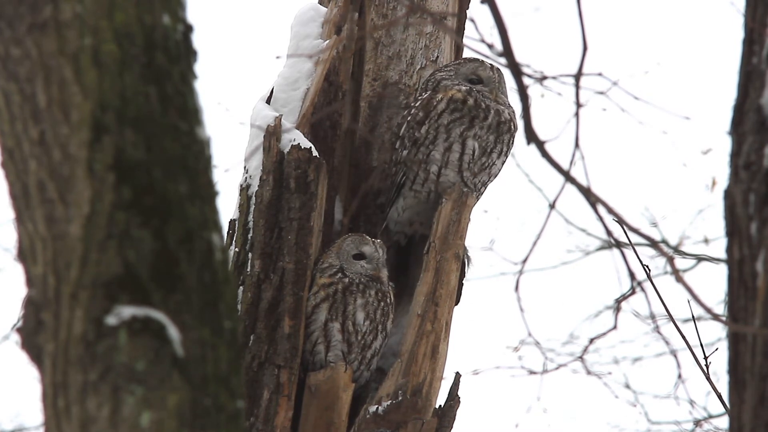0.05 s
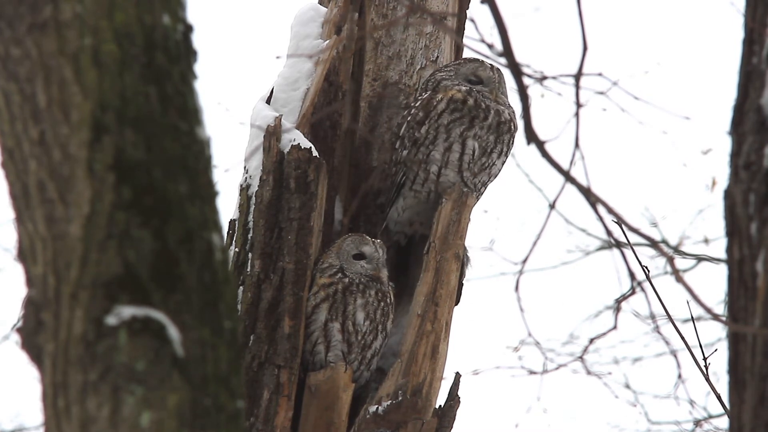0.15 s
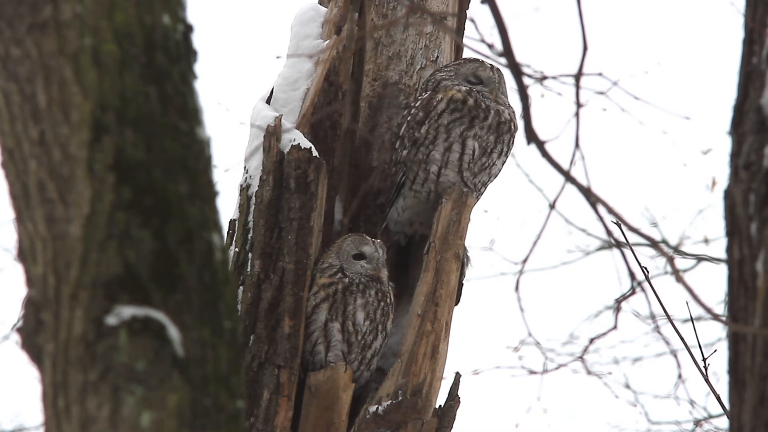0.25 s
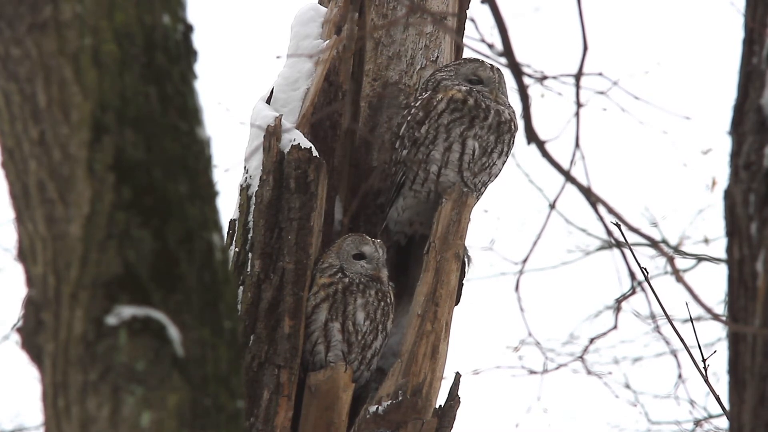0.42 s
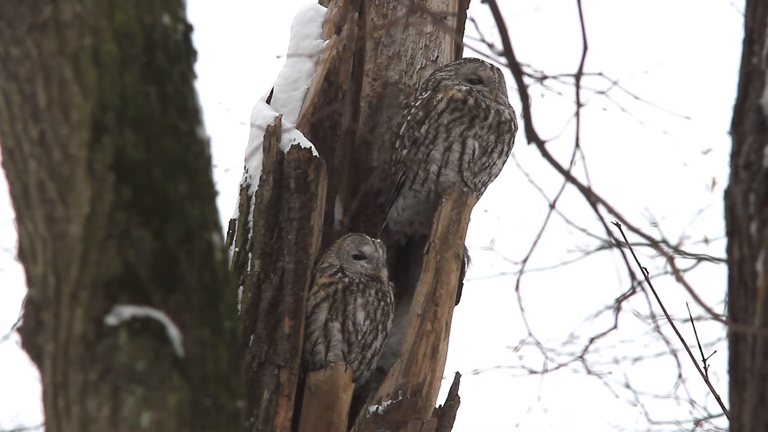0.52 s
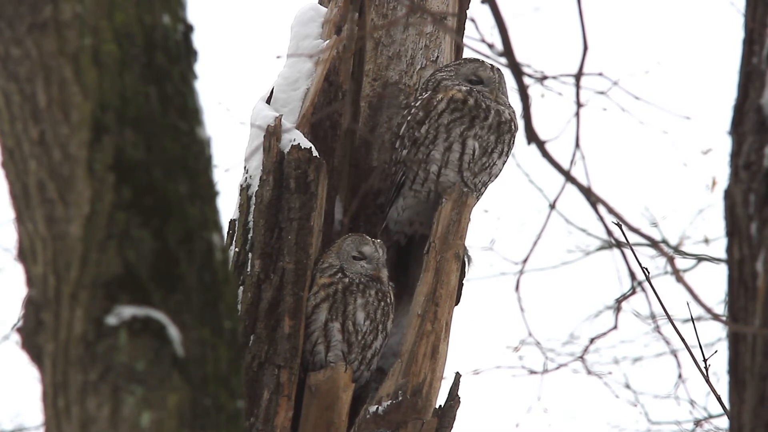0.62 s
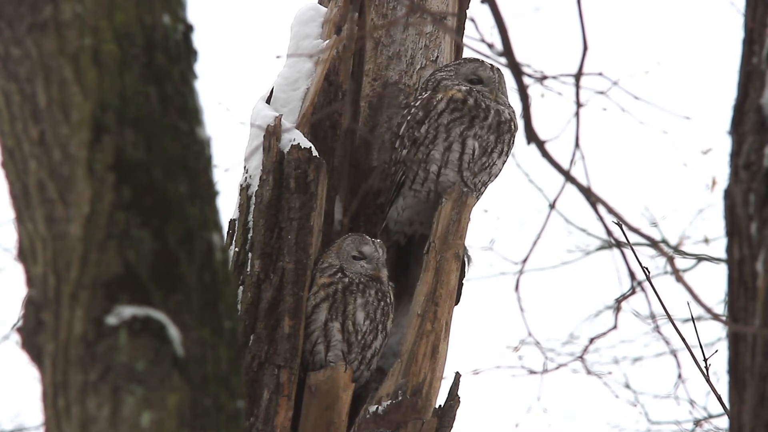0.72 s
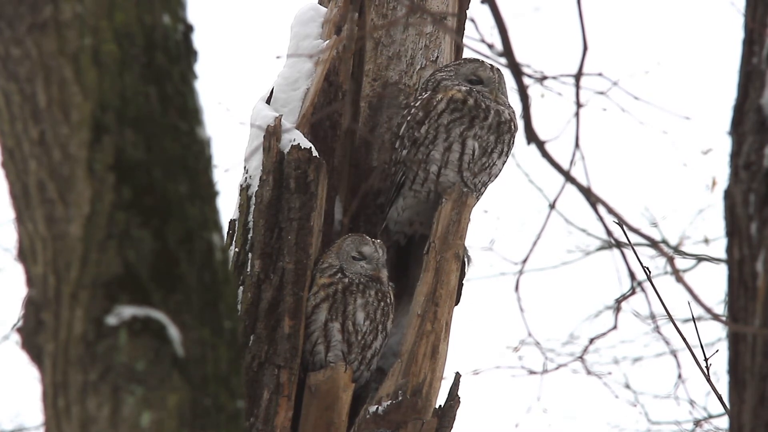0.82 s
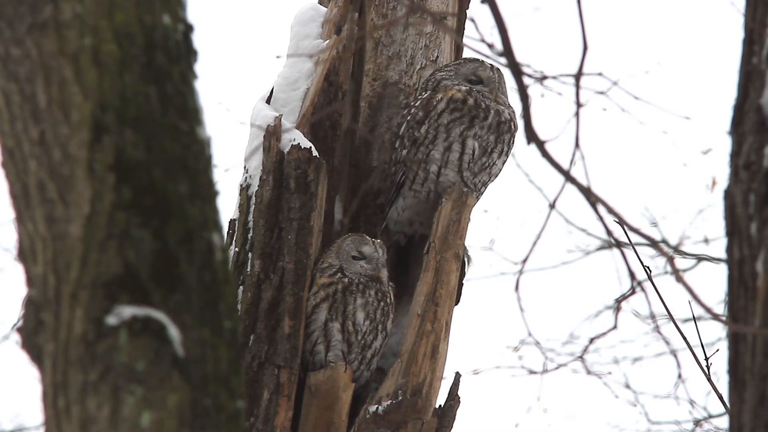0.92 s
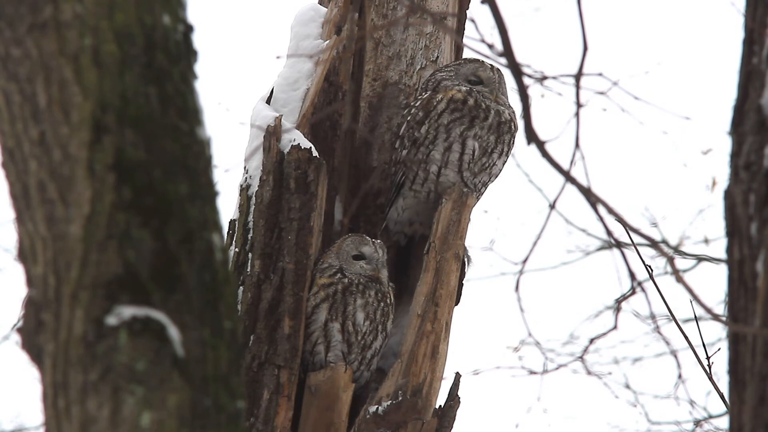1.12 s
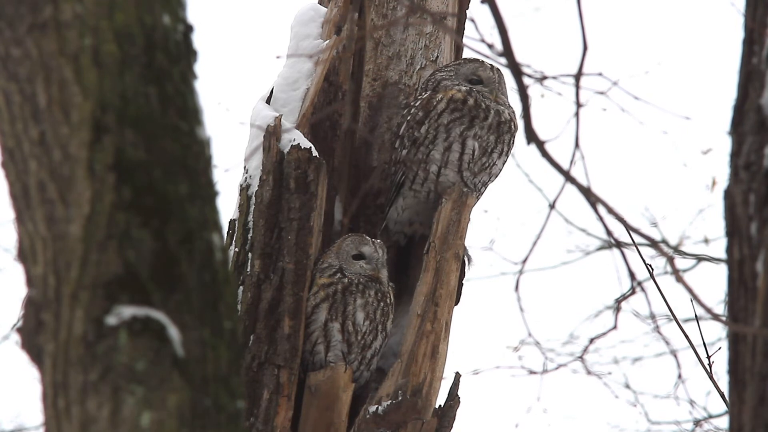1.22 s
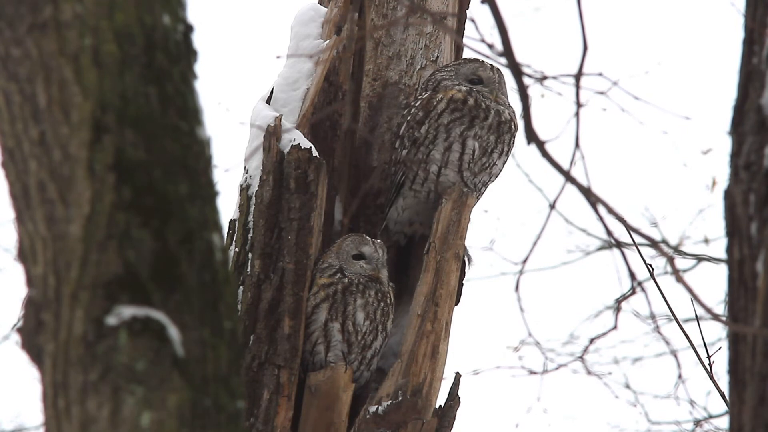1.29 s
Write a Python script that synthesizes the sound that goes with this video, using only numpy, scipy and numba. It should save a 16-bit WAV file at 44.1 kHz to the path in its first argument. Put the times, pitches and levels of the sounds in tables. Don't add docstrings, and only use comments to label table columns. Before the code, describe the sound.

A harsh, raspy bird screech rings through quiet woods after two thin, faint whistles

```python
import sys
import numpy as np
from scipy import signal
from scipy.fft import rfft, irfft
from scipy.io import wavfile
from scipy.ndimage import uniform_filter1d
from numba import njit

SR = 44100
rng = np.random.default_rng(int(sys.argv[2]) if len(sys.argv) > 2 else 0)


def volts_from_decibels(level):
    exponent = np.asarray(level, float) / 20
    return 10 ** exponent


def to_wav(sig):
    pcm = np.clip(np.atleast_2d(sig), -1, 1) * 32767
    pcm = np.round(pcm).astype(np.int16)
    wavfile.write(sys.argv[1], SR, pcm.T)


N = 59535

# time_s, effort_db, flutter_depth [0-1], beak_opening [factor on throat resonances]
SCREECH_GESTURE = [
    (.404, -28, 0.9, 1.1),
    (0.422, -9, 0.79, .94),
    (0.451, 0, 0.87, 1.004),
    (0.499, 0, 0.63, 1.024),
    (.56, -2, 0.14, 1.0),
    (.7, -2, 0.24, 1.025),
    (0.744, -2.5, 0.19, 0.989),
    (0.761, -3, .5, .95),
    (0.779, -15, 0.2, 0.65),
]
# resonance_hz, width_hz, level_db, beak_following [exponent]
THROAT_CAVITIES = [(1178, 72, -15.5, 0.12), (1404, 470, -17, 0.79), (1907, 760, -11, 0.58),
                   (2680, 950, -10.5, 1), (3131, 660, -4.5, 0.9), (3740, 830, -7.5, 0),
                   (4343, 1220, -7.5, 0), (5850, 720, -12.5, 0.27), (7310, 1100, -16, 0.22),
                   (9380, 1130, -19, 0.57), (12120, 1700, -23.5, 0), (13800, 2200, -29.5, 2)]
# time_s, pitch_hz, level_db
HIGH_NOTE = [
    (0.149, 5313, -78),
    (0.157, 5324, -57),
    (0.187, 5144, -48),
    (0.209, 5120, -52),
    (0.235, 5100, -66),
    (0.246, 5100, -74),
]
LOW_NOTE = [
    (.3235, 5400, -80),
    (.3255, 5250, -63),
    (.3285, 3900, -61),
    (.332, 3800, -55),
    (.359, 3780, -53),
    (.365, 3830, -63),
    (.369, 3780, -54),
    (.398, 3785, -52),
    (.419, 3790, -68),
]
# start_s, length_s, from_pitch_hz, to_pitch_hz, level_db
FAR_CHIPS = [
    (-.002, .022, 3720, 3700, -69),
    (.02, .012, 3600, 3690, -74),
    (0.032, 0.023, 3720, 3685, -67),
    (0.058, 0.018, 3670, 3690, -70),
    (0.076, 0.069, 3680, 3670, -76),
    (.355, 0.04, 4600, 4590, -96),
    (1.193, .022, 7100, 6080, -72),
    (1.305, .018, 6700, 6760, -70),
    (1.324, 0.011, 6400, 6150, -72),
    (1.342, .01, 5100, 5110, -67),
]
# frequency_hz, decay_60db_s
LATE_DECAY = [(1000, 2.14), (3300, 1.11), (5200, 0.74), (7500, 0.98), (12000, 1.02)]
# harmonic_number, level_db
MOTOR_HARMONICS = [(1, 0), (2, -3.5), (3, -10.5), (4, -32)]
# time_s, level_db
MOTOR_LEVEL = [
    (0, -55.5),
    (.2, -52.5),
    (.42, -51),
    (.6, -52.5),
    (.88, -51.5),
    (1.1, -55),
    (1.35, -55),
]
# frequency_hz, density_db [per Hz]
WOOD_SPECTRUM = [(25, -28.5), (110, -11.5), (200, -6), (600, -8), (1050, -16), (2200, -35.5), (3700, -36),
                 (15600, -44.5)]

PULSE_HZ, PULSE_JITTER, PULSE_SCATTER_DB = 848.9, .12, 1.5
FLUTTER_START_S, FLUTTER_HZ, FLUTTER_SAG_HZ_PER_S = .408, 199.5, 250
FLUTTER_OPEN, FLUTTER_ATTACK = .4, .03
SCREECH_DB, BREATH_DB = -33, 0.5
BRIGHT_PER_DB, CHOPPED_DULL_DB = 0.76, 4
CLOSED_HZ, CLOSED_WIDTH_HZ, CLOSED_DB, CLOSED_FADE_DB_PER_S = 1603, 200, 2, 174
RING_HZ, RING_WIDTH_HZ, RING_DB, RING_MUTE_DB = 3306, 204, -1.5, 14
RASP_S, RASP_SPREAD_S, RASP_HZ, RASP_DB = .364, .022, 225, -15
EARLY_DB, EARLY_T60_S, EARLY_DELAY_S = -5.5, 0.35, .012
LATE_DB, LATE_DELAY_S, NOTE_ECHO_DB = -15, 0.011, 1
HUM_HZ, HUM_WAVER_DB = 165.5, 1.5
WOOD_DB, WOOD_SWELL_DB, WOOD_FLICKER_DB = -48, .7, 1.0
TOP_HZ = 15850


def level(x, db):
    return x * volts_from_decibels(db) / np.sqrt(np.mean(x ** 2))


@njit
def svf(x, hz, width):
    y, b, l = np.empty(len(x)), 0., 0.
    for i in range(len(x)):
        g, k = np.tan(np.pi * hz[i] / SR), width / hz[i]
        v = (b + g * (x[i] - l)) / (1 + g * (g + k))
        b, l, y[i] = 2 * v - b, l + 2 * g * v, k * v
    return y


def band(x, hz, width):
    hz = np.clip(hz * np.ones(len(x)), 10, SR * .45)
    return svf(svf(x, hz, 1. * width), hz, 1. * width)


def read(table, hz):
    table_hz, value = np.array(table).T
    return np.interp(np.log(hz), np.log(table_hz), value)


def walk(rate):
    k = int(SR / rate)
    steps = rng.standard_normal(N)[:N // k + 1]
    held = np.repeat(steps, k)
    return 1.3 * uniform_filter1d(uniform_filter1d(held, k), k)[:N]


def syrinx_pulses(start_s):
    interval_chance, size_chance = rng.standard_normal((600, 2)).T
    at = (start_s + np.cumsum(np.exp(PULSE_JITTER * interval_chance)) / PULSE_HZ) * SR
    keep = at < N - 2
    at, size = at[keep], volts_from_decibels(PULSE_SCATTER_DB * size_chance[keep])
    pulses = np.zeros(N)
    for tap in range(-6, 7):
        place = at.astype(int) + tap
        offset = place - at
        pulses[place] += size * np.sinc(offset) * np.cos(np.pi * offset / 14) ** 2
    return pulses


def flutter_gate(since, depth):
    cycles = FLUTTER_HZ * since - FLUTTER_SAG_HZ_PER_S * since ** 2 / 2
    phase = (cycles + .03 * walk(60)) % 1
    puff = np.minimum(phase / FLUTTER_ATTACK, 1) / (1 + (phase / FLUTTER_OPEN) ** 6)
    return 1 - np.clip(depth, 0, 1) * (1 - puff)


def screech(t):
    when, *columns = np.array(SCREECH_GESTURE).T
    effort_db, depth, beak = (np.interp(t, when, c) for c in columns)
    since = t - FLUTTER_START_S
    on = (t > when[0]) & (t < when[-1])
    pulses = level(syrinx_pulses(when[0]) * on, 0) * np.sqrt(on.mean())
    drive = flutter_gate(since, depth) * on * volts_from_decibels(effort_db)

    def source():
        return (pulses + volts_from_decibels(BREATH_DB) * rng.standard_normal(N)) * drive

    tilt_db = BRIGHT_PER_DB * effort_db - CHOPPED_DULL_DB * depth
    throat = np.zeros(N)
    for hz, width, db, follows in THROAT_CAVITIES:
        octaves = np.log2(max(hz / 3300, 1))
        throat += volts_from_decibels(db + tilt_db * octaves) * band(source(), hz * beak ** follows, width)
    closed_db = CLOSED_DB - CLOSED_FADE_DB_PER_S * np.clip(since, 0, 1)
    throat += volts_from_decibels(closed_db) * band(source(), CLOSED_HZ, CLOSED_WIDTH_HZ)
    ring_db = RING_DB - RING_MUTE_DB * depth ** 2
    throat += volts_from_decibels(ring_db) * band(source(), RING_HZ * beak, RING_WIDTH_HZ)
    return level(throat, SCREECH_DB) * np.sqrt(on.mean())


def whistles(t):
    out = np.zeros(N)
    rasp_depth = 2 * volts_from_decibels(RASP_DB) * np.exp(-((t - RASP_S) / RASP_SPREAD_S) ** 2)
    rasp = 1 + rasp_depth * np.sin(2 * np.pi * (RASP_HZ * t + .3 * walk(61)))
    for note in (HIGH_NOTE, LOW_NOTE):
        when, hz, db = np.array(note).T
        on = (t > when[0]) & (t < when[-1])
        pitch_hz = np.interp(t, when, hz) + 6 * walk(49.5)
        phase = 2 * np.pi * np.cumsum(pitch_hz) / SR
        out += np.sqrt(2) * on * volts_from_decibels(np.interp(t, when, db)) * rasp * np.sin(phase)
    return out


def chips(t):
    out = np.zeros(N)
    for start, length, from_hz, to_hz, db in FAR_CHIPS:
        s = np.clip(t - start, 0, length)
        cycles = from_hz * s + (to_hz - from_hz) * s ** 2 / length / 2
        out += np.sqrt(2) * volts_from_decibels(db) * np.sin(np.pi * s / length) * np.sin(2 * np.pi * cycles)
    return out


def trunks(call, notes):
    s = np.arange(N) / SR
    sparse = rng.standard_normal(N) ** 3
    early = sparse * volts_from_decibels(-60 * s / EARLY_T60_S) * np.minimum(s / EARLY_DELAY_S, 1) ** 2
    early = level(early, EARLY_DB)
    late = np.zeros(N)
    for hz in 800 * 2. ** np.arange(0, 4.6, .5):
        late += band(rng.standard_normal(N), hz, hz / 2) * volts_from_decibels(-60 * s / read(LATE_DECAY, hz))
    late = level(late * (1 - np.exp(-s / LATE_DELAY_S)) ** 2, LATE_DB)

    def echo(x, response):
        return signal.fftconvolve(x, response / np.sqrt(N))[:N]

    return call + notes + echo(call, early) + echo(call + volts_from_decibels(NOTE_ECHO_DB) * notes, late)


def hum(t):
    phase = 2 * np.pi * np.cumsum(HUM_HZ * (1 + 0.0018 * walk(5.4))) / SR
    tones = np.zeros(N)
    for k, db in MOTOR_HARMONICS:
        tones += volts_from_decibels(db + HUM_WAVER_DB * walk(11.5)) * np.sin(k * phase + k)
    return np.sqrt(2) * volts_from_decibels(np.interp(t, *np.array(MOTOR_LEVEL).T)) * tones


def wood():
    hz = np.maximum(np.arange(N // 2 + 1) * SR / N, 1)
    noise = rfft(rng.standard_normal(N)) * volts_from_decibels(read(WOOD_SPECTRUM, hz))
    out, swell = np.zeros(N), walk(1.5)
    for octave in np.arange(4, 15, .5):
        share = np.cos(np.pi * np.clip(np.log2(hz) - octave, -.5, .5)) ** 2
        unrest = 1 if octave < 11 else .3
        sway_db = (WOOD_SWELL_DB * swell + WOOD_FLICKER_DB * walk(9)) * unrest
        out += volts_from_decibels(sway_db) * irfft(noise * share, N)
    return level(out, WOOD_DB)


def scene():
    t = np.arange(N) / SR
    birds = trunks(screech(t), whistles(t))
    return (birds + chips(t) + hum(t) + wood())[None]


def top_cut(x):
    return signal.sosfilt(signal.butter(12, 15700, fs=SR, output="sos"), x)


def record(dry):
    lowpass = signal.ellip(8, .2, 70, TOP_HZ, fs=SR, output="sos")
    mix = signal.sosfilt(lowpass, dry)
    return top_cut(mix)


dry = scene()
out = record(dry)
to_wav(out)
```